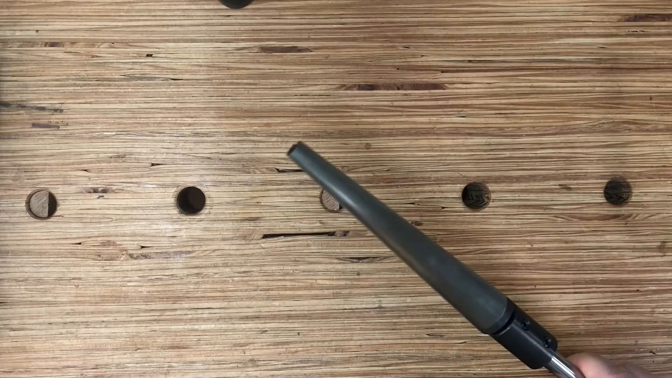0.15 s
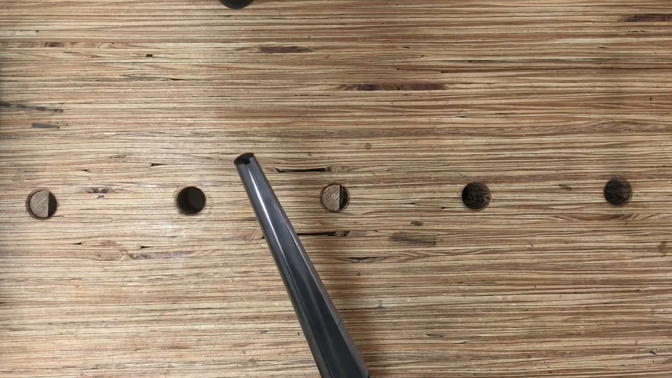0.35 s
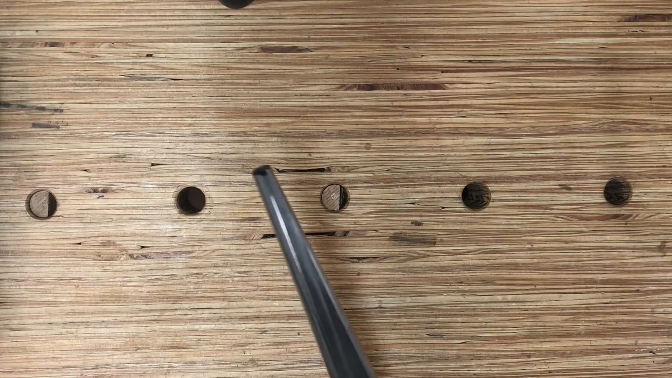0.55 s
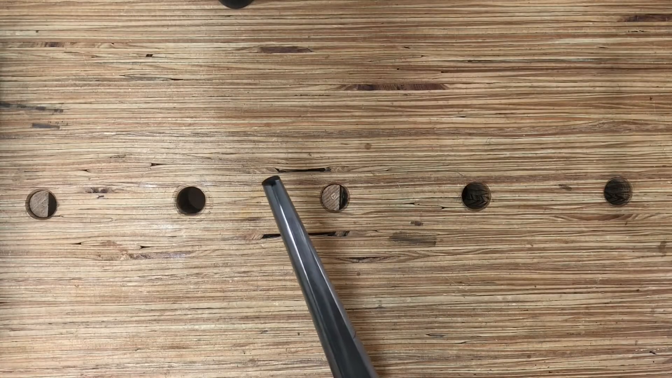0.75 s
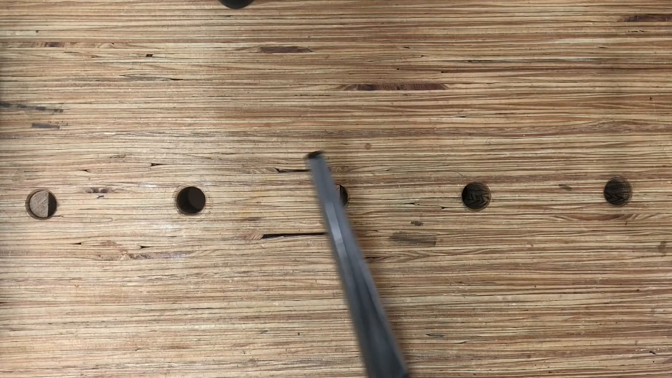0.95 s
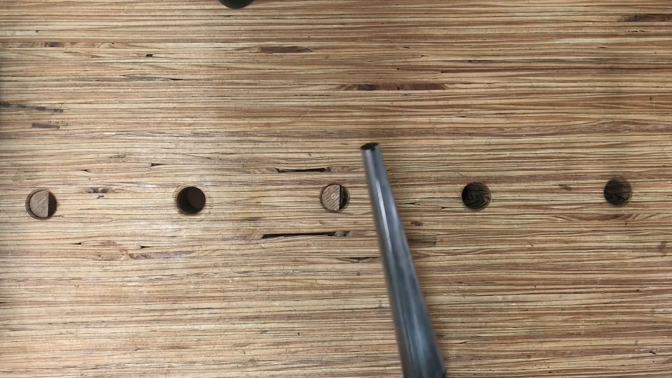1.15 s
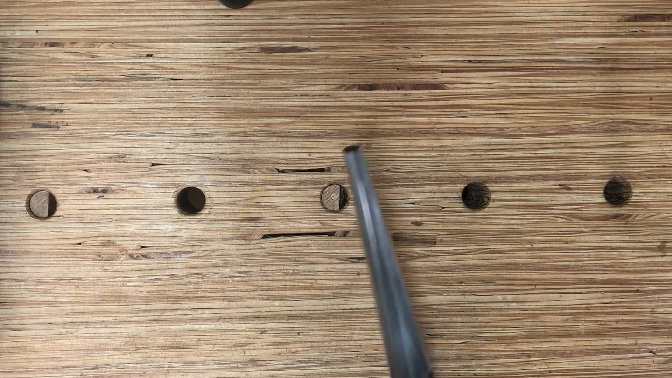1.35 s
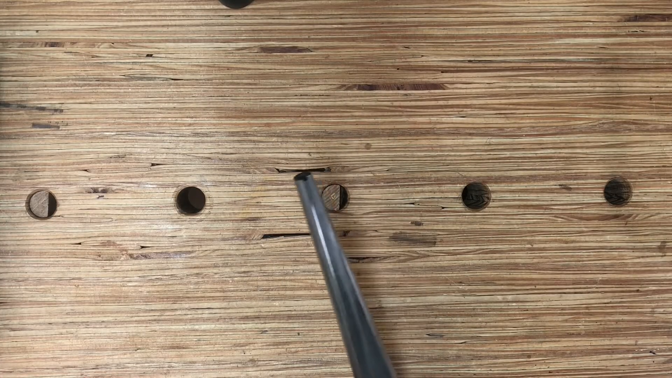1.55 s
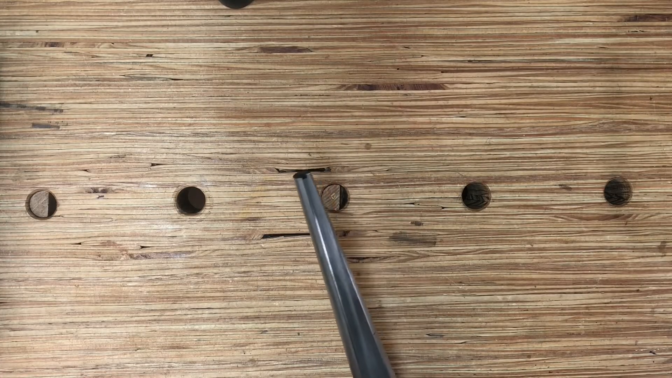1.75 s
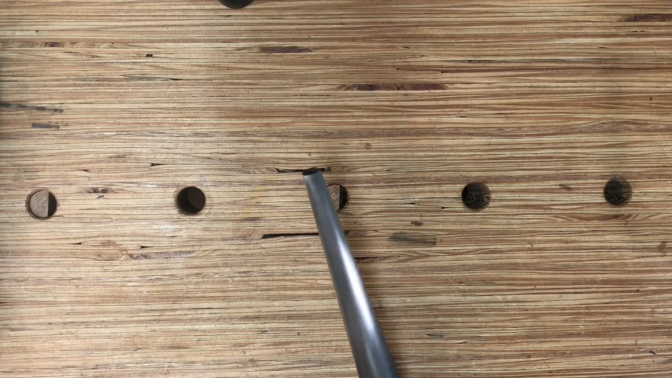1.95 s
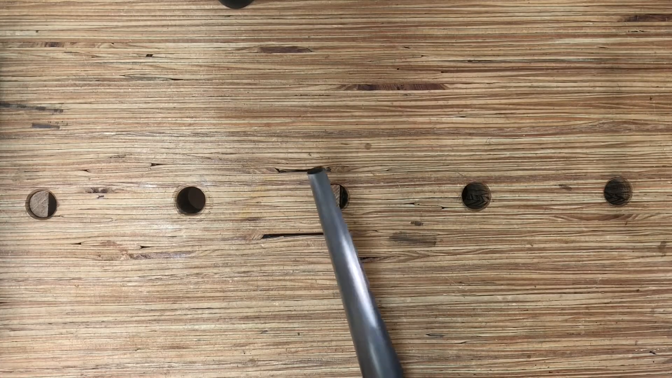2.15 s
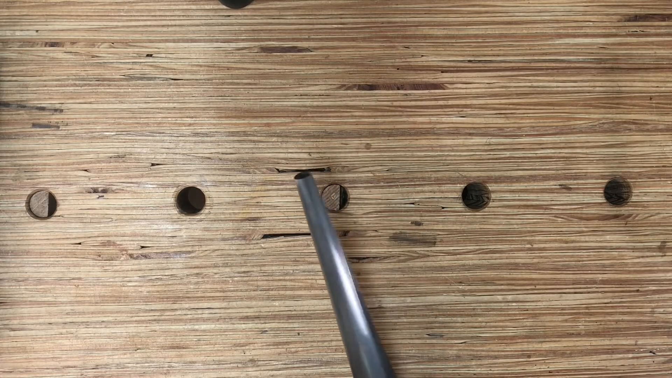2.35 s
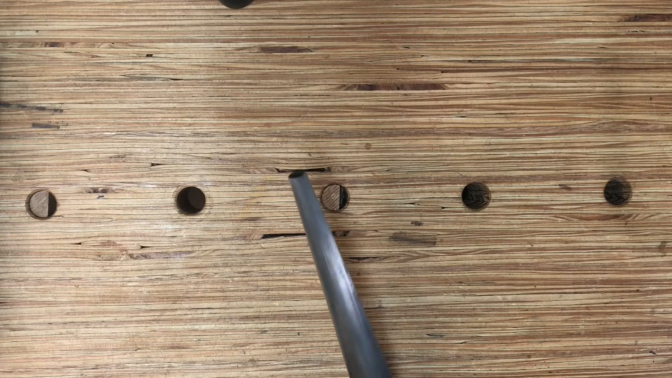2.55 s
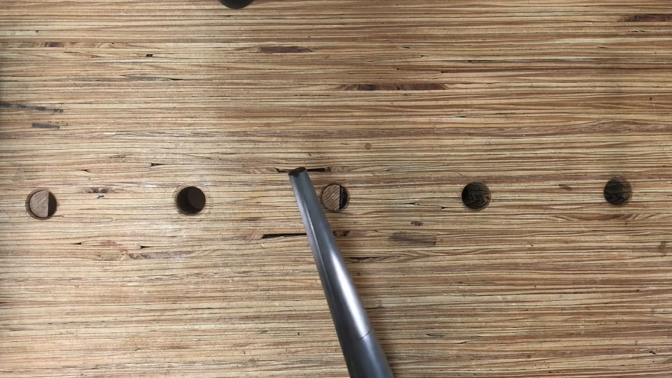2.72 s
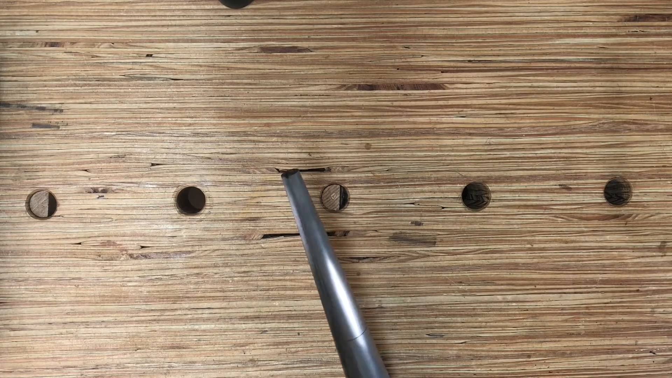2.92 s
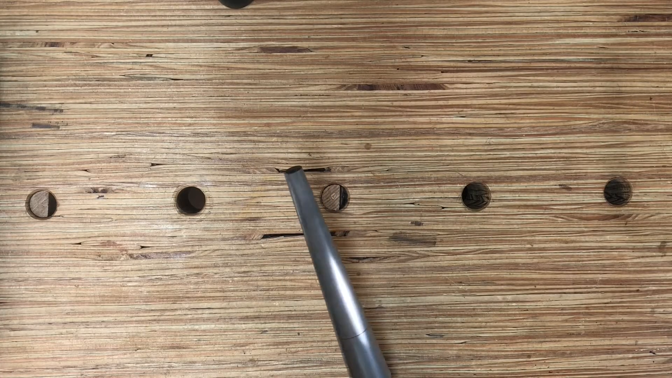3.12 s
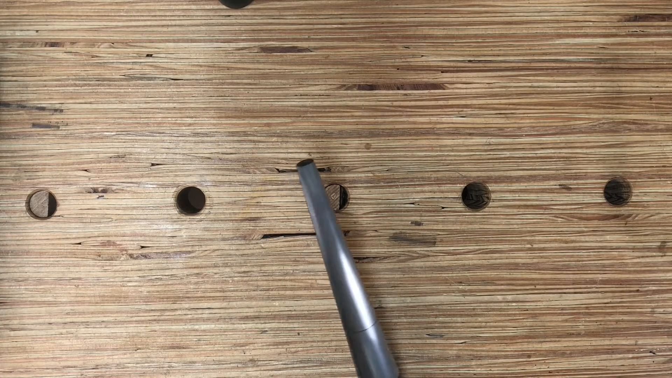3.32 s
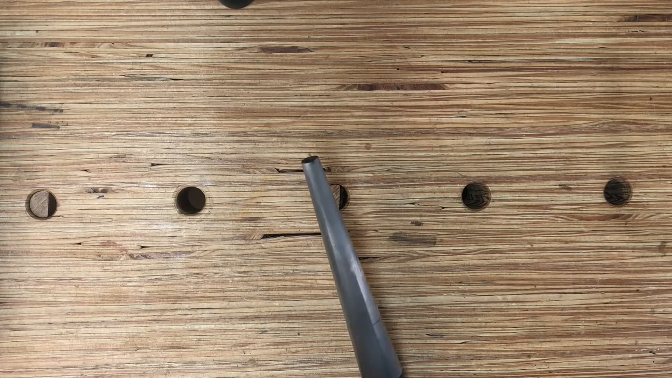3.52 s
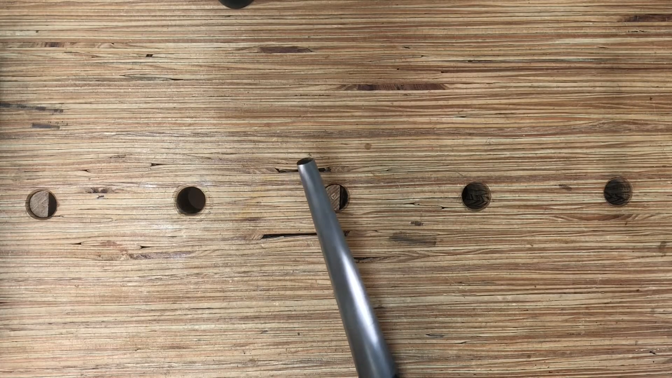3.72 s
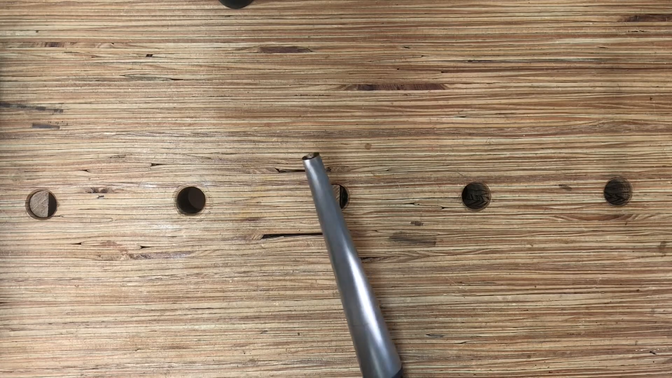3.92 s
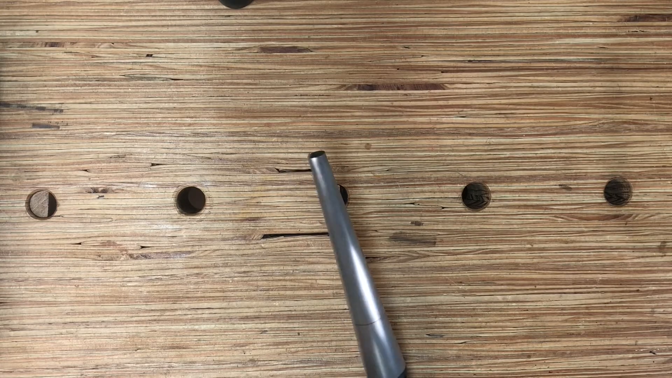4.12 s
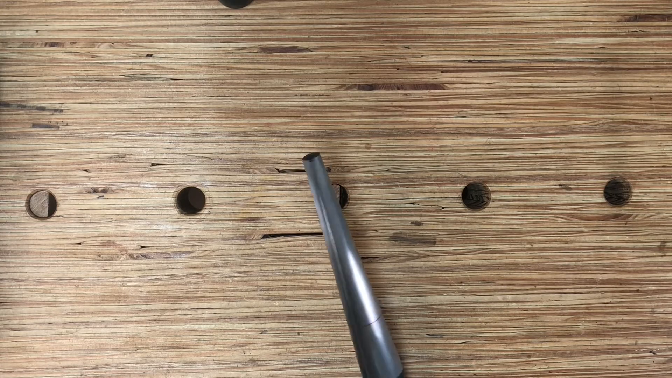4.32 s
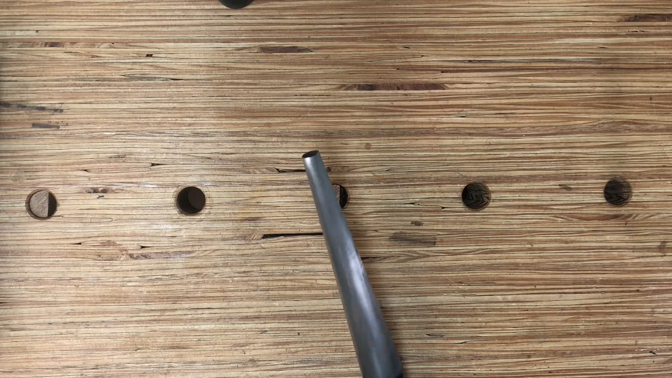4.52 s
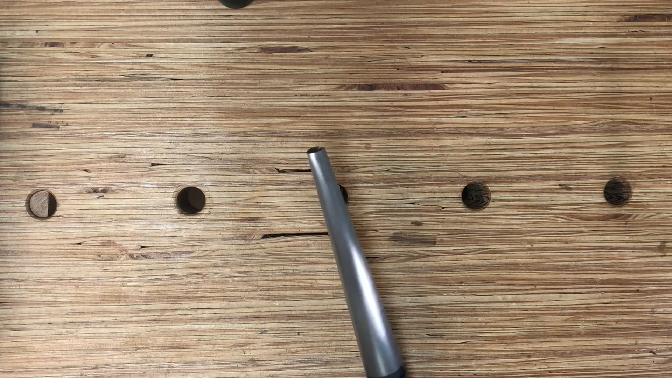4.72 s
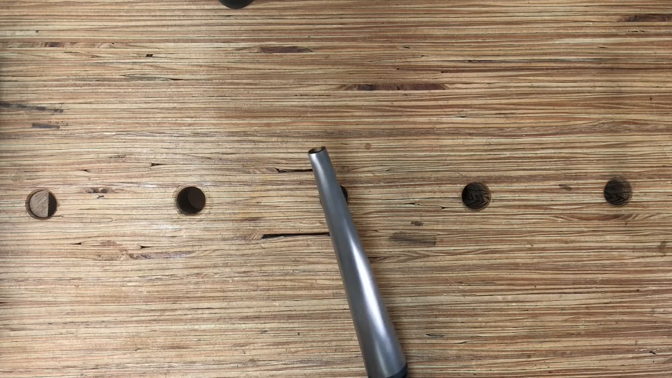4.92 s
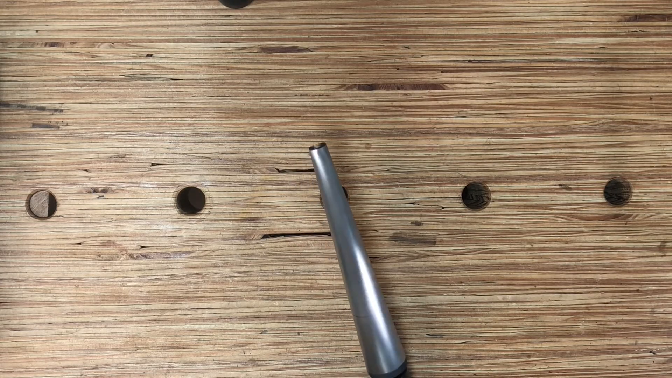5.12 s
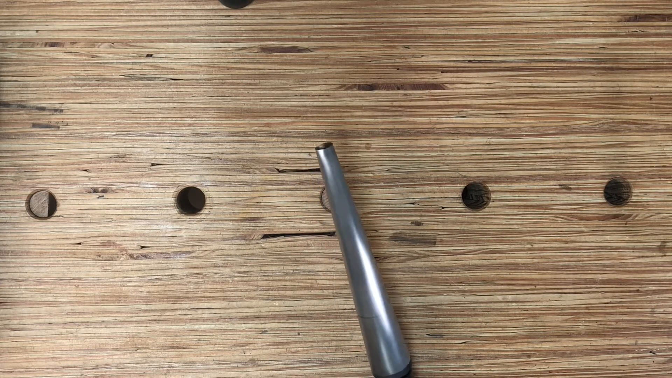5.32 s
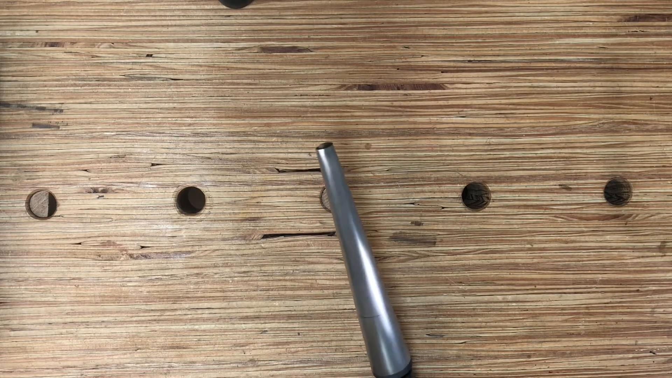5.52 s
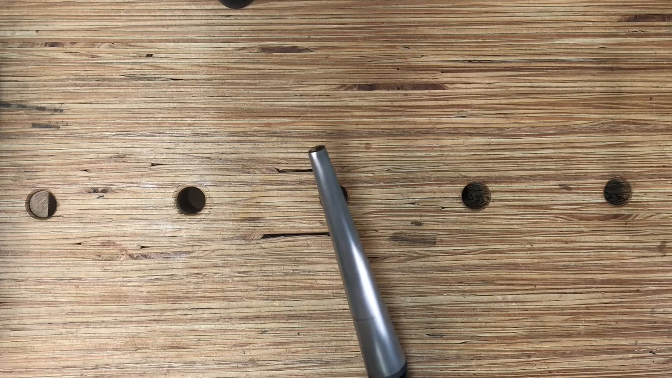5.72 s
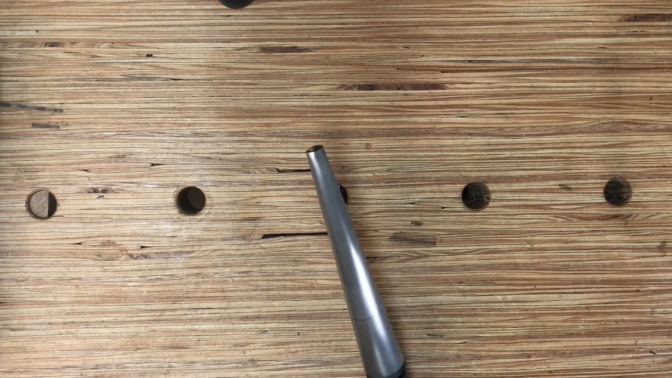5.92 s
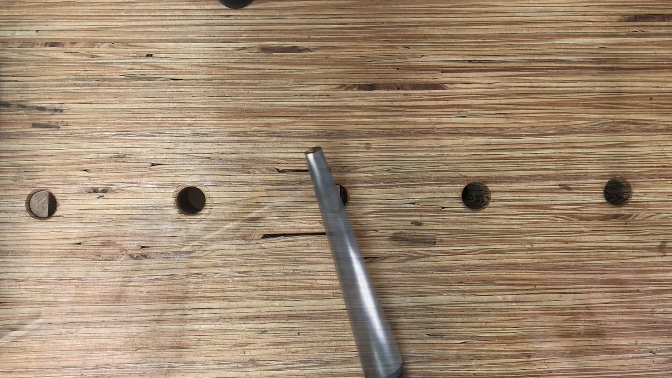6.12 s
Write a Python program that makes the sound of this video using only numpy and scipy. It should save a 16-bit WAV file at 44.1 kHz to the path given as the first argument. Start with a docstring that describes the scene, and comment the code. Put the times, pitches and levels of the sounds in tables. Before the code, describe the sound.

Low room rumble cuts off abruptly, faint handling scuffs and knocks, then a cordless drill clacks on and whirrs steadily with a thin electronic whine.

```python
"""Cordless drill running free in a workshop

A humming room sound drops away abruptly; a brushless drill is shifted in the hand, starts with a clack of
gear slack and spins a reamer freely on a long extension shaft at part throttle. Noise through housing
resonances makes the gear rattle; sines locked to the motor's rotation make the whine, gear mesh and carrier
drone; high sidebands of the chopping rate are the singing motor current. Both channels are the same."""
import sys
import numpy as np
from scipy import signal
from scipy.fft import rfft, irfft
from scipy.io import wavfile

SR = 44100
rng = np.random.default_rng(int(sys.argv[2]) if len(sys.argv) > 2 else 0)


def dump(signal):
    """Clip the signal to [-1, 1] and save it as 16-bit WAV at the path in sys.argv[1]."""
    limited = np.clip(np.atleast_2d(signal).T, -1, 1)
    pcm = np.round(limited * 32767).astype(np.int16)
    wavfile.write(sys.argv[1], SR, pcm)


N = 272052
TIME = np.arange(N) / SR
BINS_HZ = np.maximum(np.arange(N // 2 + 1) * SR / N, 1)
START_S = 1.84
CRUISE_HZ = 400   # motor turns per second at which the speed-dependent levels are stated
GEAR_RATIO, SPINDLE_RATIO = 6.452, 38.3   # motor turns per carrier turn and per spindle turn


def from_db(db):
    """A level in decibels is a logarithmic amplitude ratio; return the gain."""
    return 10 ** (np.asarray(db) / 20)


def rms_one(x):
    """Normalization: divide by the root mean square for unit power."""
    return x / np.sqrt(np.mean(x ** 2) + 1e-20)


def at_hz(points, hz):
    """Spectral envelope: interpolate levels in dB along a log-frequency axis."""
    known_hz, db = np.transpose(points)
    return np.interp(np.log(np.maximum(hz, 1)), np.log(known_hz), db)


def colour(x, db):
    """Minimum-phase filtering: a folded cepstrum gives a causal response that keeps white-noise power."""
    cepstrum = irfft(np.log(rms_one(from_db(db))), N)
    cepstrum[1:N // 2] *= 2
    cepstrum[N // 2 + 1:] = 0
    return irfft(rfft(x) * np.exp(rfft(cepstrum)), N)


def noise(points):
    """Filtered white noise: a random signal of about unit power with the given spectrum."""
    return colour(rng.standard_normal(N), at_hz(points, BINS_HZ))


def drift(rate_hz):
    """Low-pass noise: random motion of unit rms, mostly slower than rate_hz."""
    spectrum = rfft(rng.standard_normal(N)) / (1 + (BINS_HZ / rate_hz) ** 2)
    return rms_one(irfft(spectrum, N))


def sine(turns):
    """Simple harmonic motion: a sine of a phase given in turns."""
    return np.sin(2 * np.pi * turns)


def decays(events, t60):
    """Exponential decay: each event adds a jump that falls by 60 dB in t60 seconds."""
    clicks = np.zeros(N)
    for s, db in events:
        clicks[int(s * SR)] += from_db(db)
    return signal.lfilter([1], [1, -from_db(-60 / (t60 * SR))], clicks + 1e-18)


def strokes(rows, attack_s, release_s):
    """Amplitude envelope of hand movements: each swells, holds for its length and fades."""
    envelope = 0
    for s, length, db in rows:
        corners_s = [s - attack_s, s, s + length, s + length + release_s]
        envelope = envelope + from_db(db) * np.interp(TIME, corners_s, [0, 1, 1, 0])
    return envelope


def workshop(drop_s=.335, lowest_hz=16, loud_db=-39.3, quiet_db=-72.5, hum_drop_db=-26.5):
    """Superposition: broadband room noise and mains harmonics add, loud at first, then abruptly faint."""
    # room spectra before and after the drop: frequency_hz, relative_db
    loud_room = [(6, 2.5), (20, -18), (40, -22.5), (70, -26), (100, -30), (150, -43), (400, -53),
                 (1400, -56), (2500, -62.5), (4000, -67), (8000, -71.5), (15000, -76)]
    quiet_room = [(12, 1), (30, -9), (60, -12.5), (130, -27), (300, -35), (600, -43.5), (2000, -53),
                  (15000, -62)]
    # mains hum before the drop: frequency_hz, rms_db
    mains = [(60, -70), (240, -69.5), (360, -61.5), (480, -77), (720, -88), (840, -82.5)]
    # sharp click as the room sound drops: start_s, level_db
    drop_click = [(.335, -45)]
    loud = np.clip((drop_s - TIME) * 1000, 0, 1)   # falls within the last millisecond
    hum = np.sqrt(2) * sum(from_db(db) * sine(hz * TIME + rng.random()) for hz, db in mains)
    rumble = irfft(rfft(noise(loud_room)) * (BINS_HZ > lowest_hz), N)
    before = from_db(loud_db) * rumble + hum
    after = from_db(quiet_db) * noise(quiet_room) + from_db(hum_drop_db) * hum
    return loud * before + (1 - loud) * after + decays(drop_click, t60=0.0044)


def handling(grain_db=2.0, thud_cut_hz=260):
    """Friction and impact: the hand sways the tool, rubs and scuffs the grip and knocks it softly."""
    # bright scuffs, swings of the tool and palm rubs on the grip: start_s, length_s, level_db
    scuff_strokes = [(0.09, 0.031, -66), (1.19, 0.074, -84), (1.29, 0.047, -91.5), (1.52, .012, -91)]
    sway_strokes = [(1.0, .1, -66), (1.17, 0.016, -43), (1.24, .3, -52.5), (1.63, 0.14, -55.5),
                    (1.87, 0.2, -62)]
    rub_strokes = [(1.15, 0.038, -89.5), (1.22, 0.037, -83.5), (1.41, .05, -87), (1.5, .15, -84),
                   (1.71, .015, -87)]
    # light ticks of the grip, and soft knocks ahead of their band-pass: start_s, level_db
    ticks = [(1.093, -77), (1.143, -80), (1.372, -72.5), (1.405, -83), (1.444, -79), (1.484, -84),
             (1.681, -82), (1.708, -82)]
    bumps = [(1.183, -51.5), (1.444, -52), (1.78, -63), (2.495, -55), (3.195, -51.5), (3.472, -53.5)]
    # spectra of scuffing and rubbing: frequency_hz, relative_db
    scuff_spectrum = [(800, 3.5), (1400, 7.5), (2400, -3), (3800, 0.5), (7000, -9.5), (12500, -16.5),
                      (15000, -33)]
    rub_spectrum = [(350, -9.5), (660, -13.5), (800, -2), (900, 1.5), (1080, -10), (1340, -9.5),
                    (1700, -20.5), (2500, -20.5), (3150, -12), (3700, -25.5), (4800, -28), (14000, -37)]
    sway_spectrum = [(3, -3.0), (12, 4.0), (25, -15.0), (60, -30.5), (150, -42.0), (600, -74.5), (4000, -110)]

    scuffs = strokes(scuff_strokes, attack_s=0.011, release_s=0.017) * noise(scuff_spectrum)
    sway = strokes(sway_strokes, attack_s=.025, release_s=0.034) * noise(sway_spectrum)
    rub = strokes(rub_strokes, attack_s=.018, release_s=0.016) * from_db(grain_db * drift(60))
    rub = rub + decays(ticks, t60=0.015)   # the ticks share the colour of the rubbing
    thud_band = signal.butter(1, [25, thud_cut_hz], "band", fs=SR, output="sos")
    thuds = signal.sosfilt(thud_band, decays(bumps, t60=0.078))
    return sway + rub * noise(rub_spectrum) + scuffs + thuds


def motor(spin_up_s=.06):
    """Rotational inertia: a first-order lag smooths the trigger's moves into speed in turns per second."""
    # trigger finger: time_s, asked_turns_per_s
    trigger = [(1.84, 445), (2.0, 359), (2.074, 402.8), (2.217, 389.6), (2.349, 352.7), (2.674, 365.3),
               (3.18, 367.5), (3.19, 467.5), (3.776, 471), (3.905, 466.1), (4.101, 476.8), (4.495, 452.6),
               (4.772, 421.6), (5.009, 419.4), (5.266, 399.5), (5.643, 385), (6.17, 384.5)]
    known_s, known_speed = np.transpose(trigger)
    asked = np.interp(TIME, known_s, known_speed) * (TIME > START_S)
    keep = np.exp(-1 / (spin_up_s * SR))
    return signal.lfilter([1 - keep], [1, -keep], asked)


def with_speed(speed, db, rise_db):
    """Power law: level changes by rise_db per doubling of speed, down to half the cruising speed."""
    return from_db(db + rise_db * np.log2(np.maximum(speed / CRUISE_HZ, .5)))


def strain(settle_s=0.73):
    """Exponential relaxation: extra load on the gears is 1 until the start, then dies away."""
    return np.exp(-np.maximum(TIME - START_S, 0) / settle_s)


def switching(speed, turns, level_db=-63.5, chop_hz=7737, waver_db=0.9, fade_db_per_s=1.0, strain_db=2.0):
    """Modulation sidebands: chopped current sings around multiples of its rate, slowly growing fainter."""
    # switching tones: chop_multiple, offset_motor_multiples, relative_db, rise_db_per_doubling of speed
    sidebands = [(1, -1, .5, -1), (1, 1, -2, 14), (1, 0, -15, -4), (2, -1, -8.5, -6), (1, -2, -14, 1),
                 (1, -5, -16, 1), (1, -8, -11.5, 24), (1, -11, -4.5, -20), (1, -13, -11, -20)]
    spun_up = np.interp(speed, [310, 355], [0, 1])
    out = 0
    for chops, offset, db, rise_db in sidebands:
        chops, offset = round(chops), round(offset)
        gain = with_speed(speed, level_db + db + waver_db * drift(11), rise_db)
        if abs(offset) > 1:   # far sidebands need a rotor that is up to speed, and grow with the load
            gain = gain * spun_up * from_db(strain_db * strain())
        out = out + gain * sine(chops * chop_hz * TIME + offset * turns + rng.random())
    return out * from_db(-fade_db_per_s * (TIME - TIME.mean()))


def housing(force):
    """Resonance: the plastic shell and gear case colour whatever shakes them."""
    # broad colour of the gearbox: frequency_hz, relative_db
    shell = [(100, -6), (200, -19.5), (400, -13), (700, -13), (900, -6.5), (2000, -6), (3000, -1.5),
             (4500, -7), (6500, -14.5), (8500, -17.5), (10500, -26.5), (14000, -32.5)]
    # housing resonances above the broad colour: frequency_hz, width_hz, boost_db
    resonances = [(541, 48, 6), (880, 138, 2), (1176, 259, 2.5), (1610, 150, 4), (2160, 58, 4),
                  (2440, 60, 3), (2670, 90, 6), (2895, 120, 6), (3745, 85, 3), (3965, 150, 6),
                  (4620, 400, 5), (5810, 520, 5)]
    peaks_db = sum(db / (1 + (2 * (BINS_HZ - hz) / width) ** 2) for hz, width, db in resonances)
    return colour(force, at_hz(shell, BINS_HZ) + peaks_db)


def gears(speed, turns, level_db=-59, rise_db=1.5, contacts_per_turn=18, size_db=1.0, throb_db=-0.5,
          sway_db=-0.05, strain_db=2.0):
    """Random impacts: teeth and bearings chatter, harder under starting load, with blurred partials."""
    # gear slack taken up at the start: start_s, level_db
    clacks = [(1.8455, -64), (1.8477, -47), (1.851, -48), (1.8535, -60), (1.861, -52)]
    # rough partials of the gear train: motor_multiple, level_db relative to the rattle, blur_hz
    whirr = [(3, -21, 12), (6.05, -17, 150), (8.4, -18, 110), (10.1, -21, 60), (11, -22, 30)]
    touches = rng.random(N) < contacts_per_turn * speed / SR
    sizes = rng.standard_normal(N) * from_db(size_db * rng.standard_normal(N))
    force = rms_one(touches * sizes * from_db(throb_db * sine(turns)))   # loose teeth land with uneven force
    for multiple, db, blur_hz in whirr:
        phase = 2 * np.pi * multiple * turns
        force = force + from_db(db) * (drift(blur_hz) * np.sin(phase) + drift(blur_hz) * np.cos(phase))
    load_db = sway_db * sine(turns / SPINDLE_RATIO)   # the long shaft runs slightly out of true
    load_db = load_db + strain_db * strain()
    engaged = np.clip(speed / 280, 0, 1)
    rattle = force * engaged * with_speed(speed, level_db + load_db, rise_db)
    slack = decays(clacks, t60=0.021) * rng.standard_normal(N)
    return housing(rattle + slack)


def mesh(speed, turns, base_db=-61.5, teeth=26, swell_db=1.5, rough_db=4.0, slip=0.08, strain_db=5.0):
    """Tooth-passing tone: swells each spindle turn, under load and at resonances; tooth play makes it waver."""
    # how well the gear case radiates the mesh tone: frequency_hz, relative_db
    mesh_body = [(1380, -6), (1460, -4.5), (1560, -2), (1670, -7.5), (1850, -6), (1900, -1)]
    per_turn = teeth / GEAR_RATIO
    level_db = base_db + at_hz(mesh_body, per_turn * speed) + strain_db * strain()
    level_db = level_db + swell_db * sine(turns / SPINDLE_RATIO) + rough_db * drift(27)
    return from_db(level_db) * sine(per_turn * turns + slip * drift(18))   # slip in turns


def whine(speed, turns, base_db=-59.5, rough_db=2.0, slip=0.13):
    """Forced vibration: motor partials swell and fade as they cross the resonances of the case."""
    # motor and bearing partials: motor_multiple, relative_db
    partials = [(2.08, -7), (3, -7.5), (6.1, -3.5), (7, 0), (8, -4.5), (10, -3.5), (10.14, -11)]
    # how well the motor case radiates them: frequency_hz, relative_db
    whine_body = [(1100, -12.5), (1260, -7.5), (1400, -26), (2300, -6.5), (2520, -9), (2720, -8),
                  (2950, -2.5), (3150, -.5), (3380, -0.5), (3650, -2), (3760, 2.5), (3880, -7), (4700, -6)]
    out = 0
    for multiple, db in partials:
        level_db = base_db + db + at_hz(whine_body, multiple * speed) + rough_db * drift(27)
        out = out + from_db(level_db) * sine(multiple * turns + slip * drift(26))   # slip in turns
    return out


def drone(speed, turns, base_db=-65.5, rise_db=2, waver_db=2.1, early_db=-11.5, build_s=1.64):
    """Rotating unbalance: the planet carrier shakes the whole tool, building up after the start."""
    # drone of the turning carrier: carrier_multiple, relative_db
    harmonics = [(1, 2.5), (2, -3.5), (3, -12.5), (4, -12.5), (5, -15)]
    # how well the tool radiates that drone: frequency_hz, relative_db
    drone_body = [(56, -3), (62, 2.5), (75, -2), (113, -0.5), (125, -4), (150, -3), (180, 3), (220, -11),
                  (300, -4.5)]
    out = 0
    for multiple, db in harmonics:
        per_turn = round(multiple) / GEAR_RATIO
        level_db = db + at_hz(drone_body, per_turn * speed) + waver_db * drift(27)
        out = out + from_db(level_db) * sine(per_turn * turns + rng.random())
    build_db = np.interp(TIME, [START_S, START_S + build_s], [early_db, 0])
    return with_speed(speed, base_db + build_db, rise_db) * out


def air(speed, turns, level_db=-77, rise_db=15, throb_db=6.0):
    """Flow noise: the fan on the motor shaft pushes air through the vents, throbbing once a turn."""
    # cooling air: frequency_hz, relative_db
    air_spectrum = [(2000, -15.5), (5000, -15.5), (8500, -2.5), (10300, -10), (12000, -14), (16000, -24)]
    return with_speed(speed, level_db + throb_db * sine(turns), rise_db) * noise(air_spectrum)


def scene():
    """Common excitation: motor speed drives every part of the drill, beside the hand and the room."""
    room = workshop()
    hand = handling()
    speed = motor()
    turns = np.cumsum(speed) / SR
    powered = np.clip((TIME - START_S) / 0.0069, 0, 1)   # the current builds up within milliseconds
    turning = np.clip(speed / 355, 0, 1) ** 6   # moving parts are quiet until the rotor runs
    moving_parts = mesh(speed, turns) + whine(speed, turns) + drone(speed, turns) + air(speed, turns)
    drill = powered * switching(speed, turns) + gears(speed, turns) + turning * moving_parts
    return np.tile(drill + hand + room, (2, 1))


def record(dry, cutoff_hz=15700):
    """Band limiting: a steep elliptic low-pass removes the top."""
    return signal.sosfilt(signal.ellip(10, .1, 80, cutoff_hz, fs=SR, output="sos"), dry)


dry = scene()
out = record(dry)
dump(out)
```